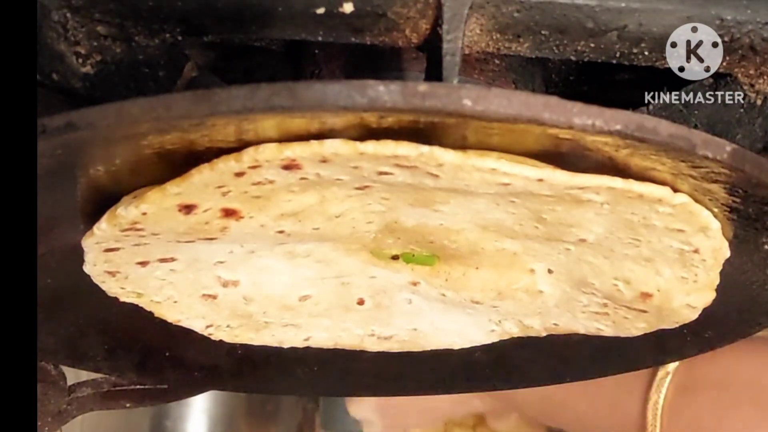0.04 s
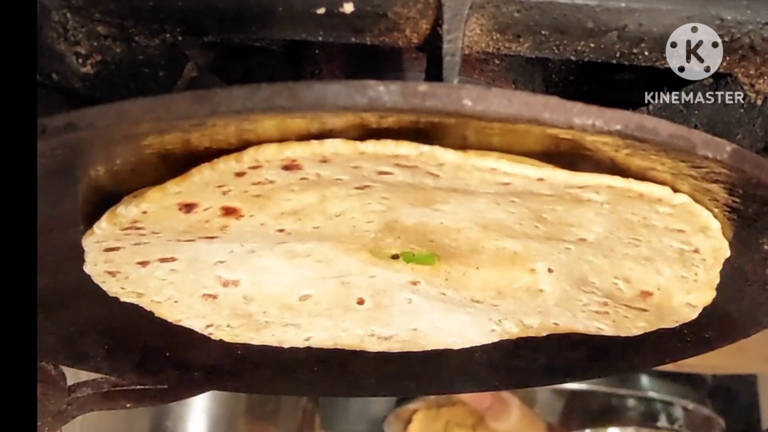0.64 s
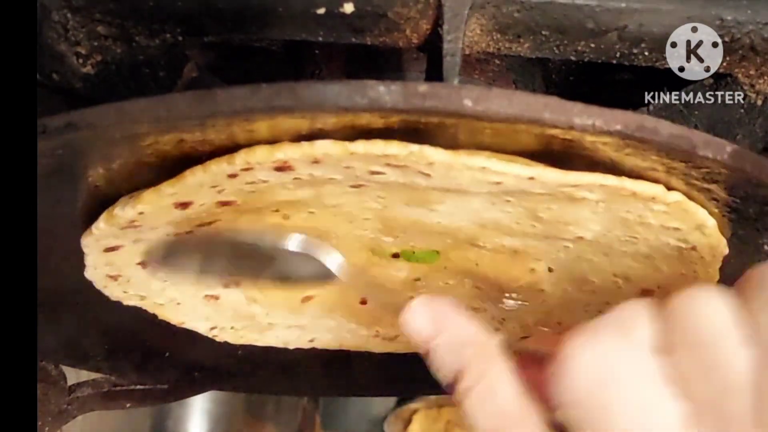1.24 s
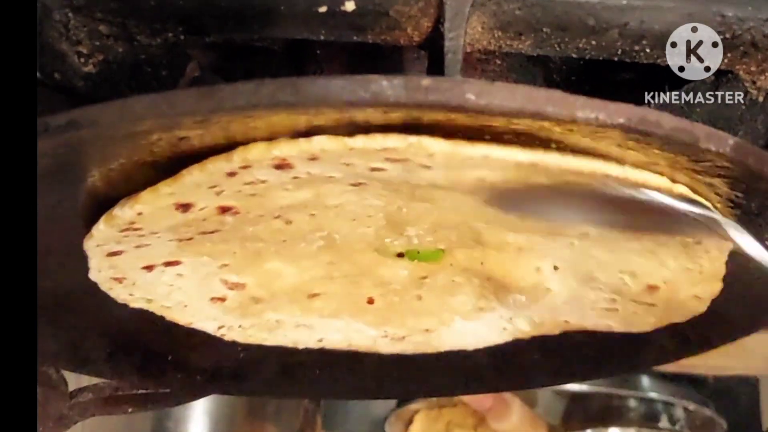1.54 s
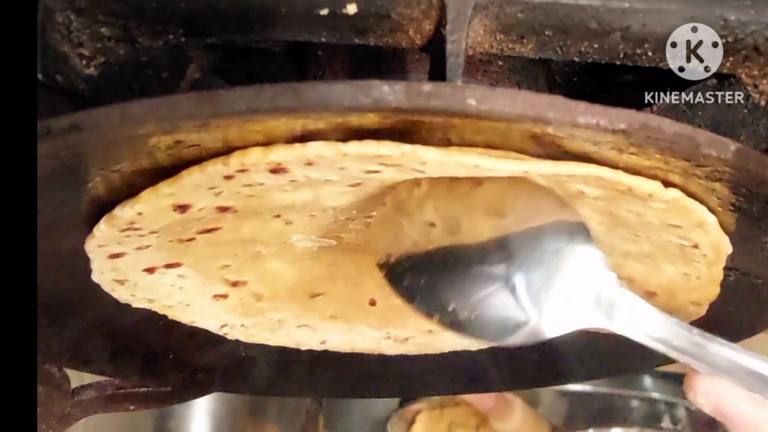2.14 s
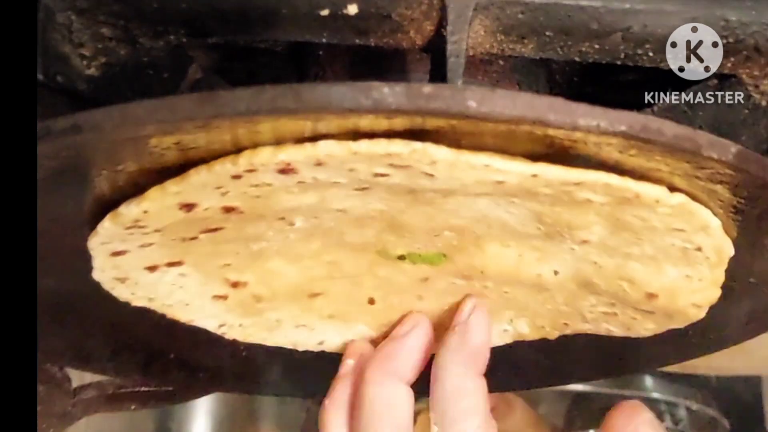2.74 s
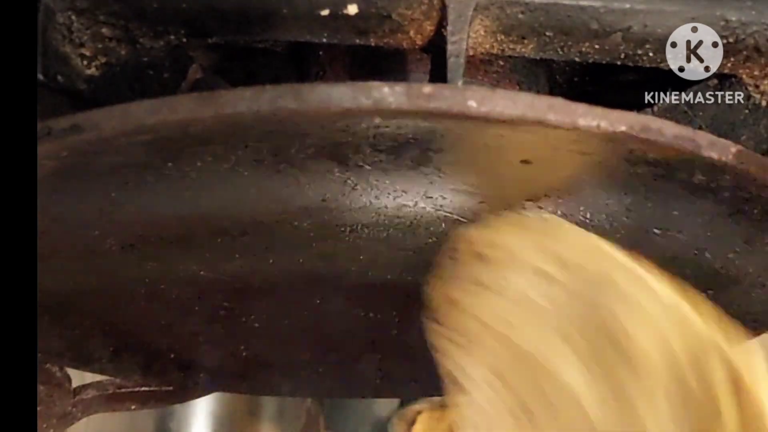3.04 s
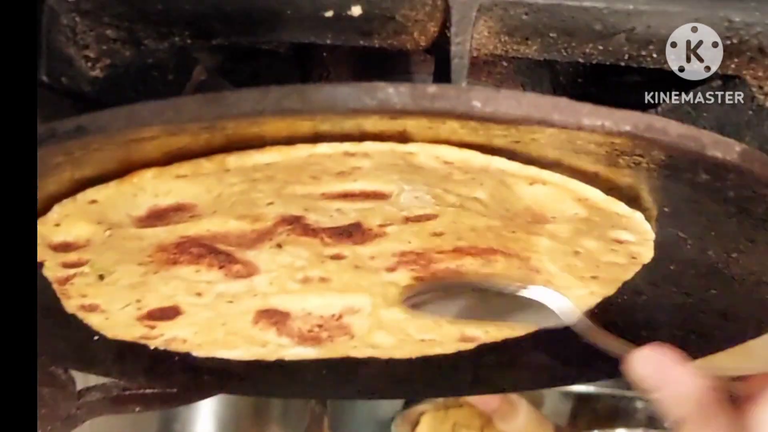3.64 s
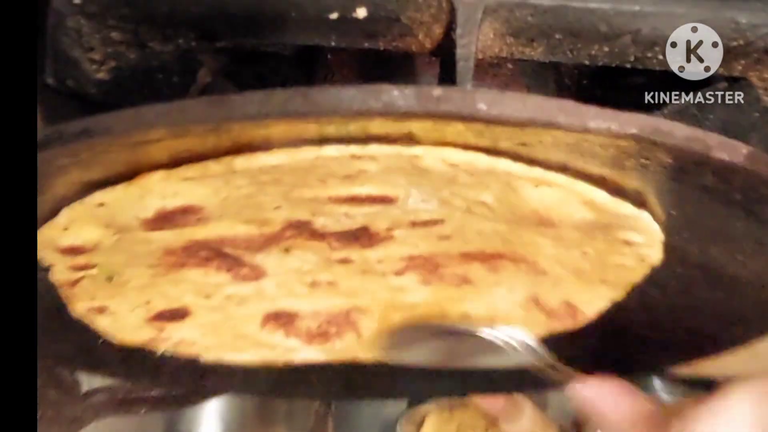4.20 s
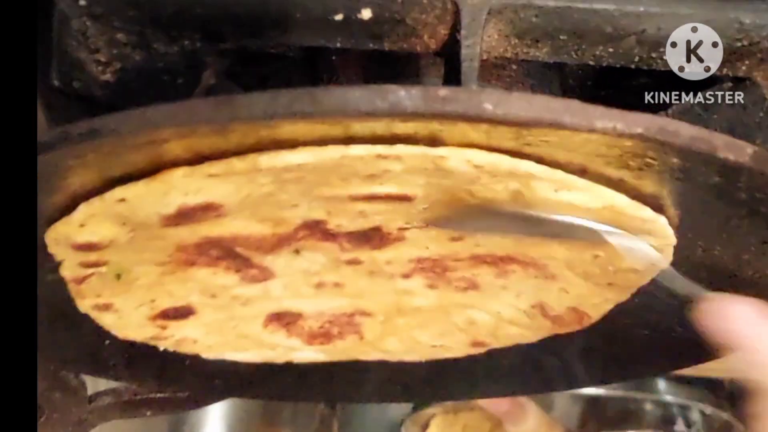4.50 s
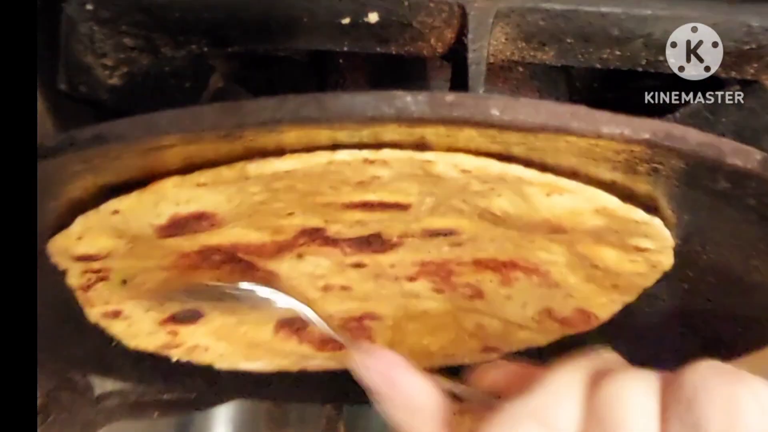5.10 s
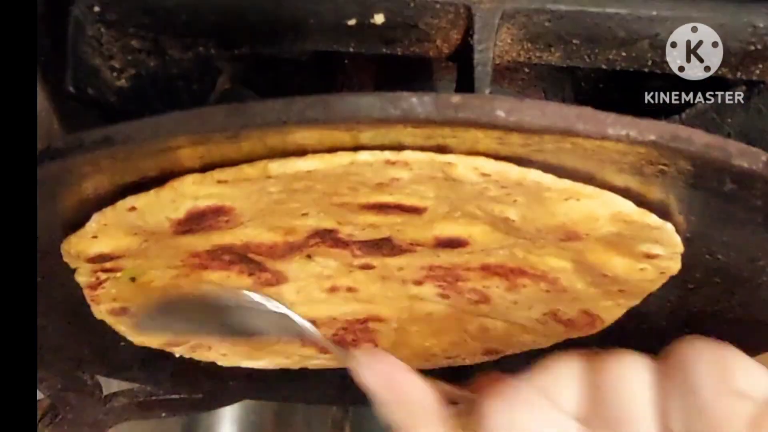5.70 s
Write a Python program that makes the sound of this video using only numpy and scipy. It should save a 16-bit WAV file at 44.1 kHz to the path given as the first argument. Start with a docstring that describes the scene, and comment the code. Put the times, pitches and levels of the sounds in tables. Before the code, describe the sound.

Close up in a small kitchen, flatbread fizzes faintly on an iron griddle over a low burner rumble. A steel spoon rubs oil across it, and each push makes the griddle knock and chatter on its support. Midway the spoon goes down with a sharp clack and the bread flops over softly. Heavier clunks follow as the spoon presses, with one loud clank near the end. The oil spits now and then.

```python
"""Flatbread on an iron griddle

A gas stove in a small kitchen, close up, on a two-port stereo microphone. A steel spoon spreads oil
and presses the frying bread; each push rocks the griddle, which chatters on its support. The spoon
goes down with a clack while the bread is turned. Oil fizzes and spits over a low rumble."""
import sys
import numpy as np
from scipy import signal
from scipy.fft import rfft, irfft
from scipy.io import wavfile
from scipy.ndimage import uniform_filter1d

SR = 44100
rng = np.random.default_rng(int(sys.argv[2]) if len(sys.argv) > 2 else 0)


def int16_out(signal):
    """Quantize to a 16-bit WAV file."""
    q = np.round(np.clip(np.atleast_2d(signal).T, -1, 1) * 32767)
    wavfile.write(sys.argv[1], SR, q.astype(np.int16))


N = 253923
TIME = np.arange(N) / SR
RING_T = np.arange(SR // 2) / SR  # time after a blow [s]
PRESS_S = 3.85  # from here the spoon presses hard: more stove thump, more drag


def griddle():
    """Each knock rings the iron plate, the contact point and the stove beneath."""
    # modes of the plate and of the stove: (frequency [Hz], level [dB], t60 [s])
    plate_modes = [(426, -4, 0.25), (481, -1, 0.25), (520, -3, 0.25), (570, -1, 0.25), (686, -3, 0.25),
                   (748, -2, 0.25), (798, -1, 0.25), (835, -3, 0.25), (892, -5, 0.25), (939, 0, 0.25),
                   (970, -5, 0.25), (1044, -4, 0.25), (1079, -6, 0.25), (1108, -3, 0.25), (1154, -1, 0.25),
                   (1192, -3, 0.25), (1222, -4, 0.25), (1367, -18, 0.25), (1409, -14, 0.25),
                   (1475, -14, 0.25)]
    stove_modes = [(67.4, -9.5, 0.87), (99.5, 1.5, 0.33), (152.5, 5, 0.3), (243, -8.5, 0.38),
                   (279.3, -11.5, 0.72), (279, -30, 0.21), (326.2, -12.5, 0.58)]
    # metal on metal, damped by the dough: (frequency [Hz], level [dB], t60 [s])
    contact_modes = [(2870, -14, .02), (4090, -8, .02), (4320, 0, .03), (4480, -6, .02), (4690, -6, .022),
                     (5320, -13, .02), (5850, -7.5, .018), (6400, -13, .015)]
    body, bright = np.zeros((2, 2, N))
    t = RING_T[:4096]
    lean_left = amp([[1], [-1.5]])
    for s, db, thump_db, ring_db in knocks():
        length = 0.014 + 0.031 * amp(2 * (db + 10))  # the hardest pushes chatter longest
        force = chatter(length / 2)
        plate = ring(plate_modes, spread=0.89) * onset(0.0049)
        stove = ring(stove_modes, spread=0.81) * onset(0.014)  # the heavy frame starts slowly
        stove *= np.exp(-RING_T / 0.068)
        slip = rng.standard_normal(len(t)) * t * np.exp(-t / 0.0058)  # a short metal scrape
        add(body, s, amp(db - 9.5) * peaked(convolve(force, plate)))
        add(body, s, amp(db - 6) * peaked(clunk(length)))
        add(body, s, amp(thump_db + 1.5) * lean_left * peaked(convolve(force, stove)))
        add(bright, s, amp(ring_db - 3) * peaked(convolve(slip, ring(contact_modes, spread=2.63))))
    return body + bright + amp(-16) * kitchen(bright)


def knocks(count=4, rock_s=0.022, scatter=0.0796, still_db=-43):
    """A push knocks the griddle, which rocks on, weaker and duller: yields time and three levels."""
    # the spoon tips the griddle: (time [s], knock [dB], bright ring [dB], loss per rock [dB])
    pushes = [(1.141, -30.5, -48, 14), (1.232, -35.5, -74, 5.5), (1.380, -29, -43.5, 14),
              (1.713, -36.5, -58, 14), (1.798, -36.5, -75, 4), (1.976, -24.5, -37, 21),
              (2.058, -38, -56, 12), (2.144, -35, -60, 15), (2.186, -33, -49, 10),
              (2.283, -28.5, -42.5, 18), (2.329, -33, -48, 20), (2.487, -33, -75, 12),
              (2.558, -24.5, -39, 20), (2.884, -39.5, -70, 8), (2.925, -41.5, -69, 8), (3.009, -39, -75, 6),
              (3.293, -24, -40, 8), (3.573, -34, -51, 14), (3.783, -38, -52, 14), (3.871, -32.5, -70, 12),
              (3.893, -26, -60, 13), (3.930, -18, -44, 13), (3.945, -19, -49, 12),
              (3.964, -16.5, -39.5, 12.5), (4.009, -29.5, -40, 14), (4.18, -27, -45.5, 16),
              (4.218, -24, -70, 24), (4.409, -19.5, -38, 5), (4.534, -31, -62, 14), (4.627, -27.5, -53, 7),
              (4.760, -22, -39.5, 6.5), (4.807, -25.5, -51, 20), (4.83, -26, -66, 10),
              (4.994, -33, -72, 15), (5.265, -11, -26.5, 6.5), (5.534, -33.5, -57, 10),
              (5.578, -34, -72, 12)]
    for s, db, ring_db, loss_db in pushes:
        uneven = rng.standard_normal(count)
        thump_db = -43 + 0.38 * (db + 25) + 5.5 * (s > PRESS_S)
        for k in range(count):
            lost_db = k * loss_db
            if k == 0 or db - lost_db > still_db:  # a weaker rock no longer lifts the griddle
                # the heavy stove loses least, the bright ring most
                yield s, db - lost_db, thump_db - 0.55 * lost_db, ring_db - lost_db - 1.5 * k
            s += rock_s * (1 + scatter * uneven[k])


def chatter(decay_s, rebounds_per_s=1400):
    """Force of a knock: a first blow and quick, dying rebounds."""
    t = RING_T[:4096]
    rebounds = (rng.random(len(t)) < rebounds_per_s / SR) * rng.standard_normal(len(t))
    force = 0.5 * rebounds * np.exp(-t / decay_s)
    force[0] = 1
    return force


def clunk(length, room_t60=0.61):
    """Crowded modes of pan and grate sound during the chatter; the kitchen holds them a little."""
    # the dense part of a knock: (frequency [Hz], density [dB])
    colour = [(60, -33), (200, -5.5), (370, -10), (470, 1), (640, -2), (800, 1), (1000, -4.5), (1200, -0.5),
              (1320, -10.5), (1700, -19.5), (2300, -25.5), (3500, -32.5), (5500, -32.5), (8000, -44.5),
              (15000, -65)]
    contact = np.exp(-(RING_T / length) ** 2)
    held = amp(-14 - 60 * RING_T / room_t60)
    held *= np.sqrt(length / 0.0057)  # a longer contact fills the room more
    return coloured(port_noise(len(RING_T)) * onset(0.00058) * np.hypot(contact, held), colour)


def spoon_down():
    """The spoon touches, then drops: a hard crack, a short hollow ring and the room after it."""
    # the two contacts: (time [s], ring [dB], crack [dB])
    clacks = [(3.252, -38.5, -61), (3.292, -19, -21)]
    # the surface it strikes: (frequency [Hz], level [dB], t60 [s])
    surface_modes = [(765, -4.5, 0.15), (840, 0.5, 0.026), (1110, 7.5, 0.033)]
    # the crack: (frequency [Hz], density [dB])
    crack_colour = [(200, -26), (600, -11), (900, -4), (1500, -6.5), (1950, -3), (2400, 2), (2800, -0.5),
                    (3900, -3), (4600, -14.5), (6200, -16.5), (7500, -24), (12000, -18.5), (15500, -16)]
    knock, crack = np.zeros((2, 2, N))
    for s, ring_db, crack_db in clacks:
        add(knock, s, amp(ring_db) * peaked(ring(surface_modes, spread=0.2) * onset(0.00068)))
        add(crack, s, amp(crack_db) * peaked(burst(crack_colour, t60=0.021)))
    return knock + crack + kitchen(amp(-14) * knock + amp(1) * crack)


def spoon_clinks():
    """The steel spoon clinks lightly."""
    # clinks: (time [s], level [dB], room send [dB])
    clinks = [(.2245, -34, -3), (.228, -35, 0), (5.267, -30, -9), (5.271, -33, -4.5)]
    # struck steel: (frequency [Hz], density [dB])
    colour = [(200, -4), (750, -15), (1100, -2), (1600, -17.5), (2600, -16), (3400, -3.5), (4700, -12),
              (5500, -2.5), (7200, -5), (9000, -4), (11400, -8.5), (13700, -4.5), (15500, -24)]
    return ticks(clinks, colour, t60=0.018)


def frying(flop_s=3.3, turned_s=3.55, soften_s=0.27):
    """Oil bubbles burst, the bread rubs on the iron, and the dragging spoon makes the plate murmur."""
    # how hard the bread is worked: (time [s], effort [dB])
    effort = [(0.0, -65.5), (0.18, -70), (0.35, -69.5), (0.72, -75), (1.02, -70.5), (1.25, -62),
              (1.64, -58.5), (1.72, -60), (2.95, -66.5), (3.08, -72), (3.33, -72), (3.45, -66.5),
              (3.82, -62), (4.12, -64.5), (4.52, -60.5), (5.24, -61), (5.42, -68), (5.76, -67.5)]
    # spoon or finger smears the oily bread: (time [s], swell [dB], half length [s])
    smears = [(0.12, 6.5, 0.093), (0.337, 11.5, 0.027), (1.107, 8.5, 0.067), (1.626, 8.5, 0.019),
              (2.874, 8.5, 0.06), (2.946, 9.5, 0.022), (3.06, 8.5, 0.048), (3.83, 7, 0.024),
              (5.054, 3.5, 0.013)]
    # bubbles, rubbing bread and dragging spoon: (frequency [Hz], density [dB])
    fizz_colour = [(2000, -31), (4500, -6), (7000, -6), (9500, 0.5), (12000, 4), (13500, 1.5), (15000, -15),
                   (16000, -28)]
    rub_colour = [(900, 1.5), (1800, -6), (2500, 1), (3300, 2.5), (5000, 1.5), (6500, -1.5), (10000, -6.5)]
    drag_colour = [(29, -45), (50, -8.5), (123, -2.5), (172, -4), (215, -5.5), (281, -10.5), (314, -5),
                   (411, -18), (466, -4.5), (513, -20), (726, -12), (878, -19), (1150, -10), (1580, -68),
                   (2200, -31), (2860, -61), (4840, -120)]
    work = amp(np.interp(TIME, *np.transpose(effort)) + 61)  # one during steady spreading
    smear = amp(sum(db * np.exp(-((TIME - s) / half) ** 2) for s, db, half in smears))
    # once turned, the dry crust rubs louder until oil softens it
    crust = amp(10.5 * (TIME > turned_s) * np.exp(-abs(TIME - turned_s) / soften_s))
    landed = np.maximum(TIME - flop_s, 0) / 0.04
    flop = amp(-36.5) * landed * np.exp(1 - landed)  # the bread lands with a dull swell
    fizz = amp(-57) * work * smear ** 0.45 * grains(fizz_colour, per_s=6000, spread_db=1)
    rub = amp(-60) * work ** 0.88 * smear * crust * grains(rub_colour, per_s=5000, spread_db=3.5)
    drag = amp(-50 + 2.5 * (TIME > PRESS_S)) * work ** 0.84
    murmur = (drag + flop) * unit(coloured(port_noise(N), drag_colour))
    return fizz + rub + murmur


def oil_spits():
    """Hot oil spits in single sharp snaps."""
    # spits: (time [s], level [dB], room send [dB])
    spits = [(1.731, -32, -9), (2.033, -48, 5), (3.08, -58, -5), (3.292, -34, -24)]
    # one snap: (frequency [Hz], density [dB])
    colour = [(1500, -42), (4000, -47), (6500, -10), (9000, 2.5), (13500, 5), (15500, -6.5)]
    return ticks(spits, colour, t60=0.018)


def steam(waver=0.013):
    """Steam trapped under the turned bread escapes in thin, unsteady whistles."""
    # squeaks: (time [s], length [s], pitch [Hz], level [dB])
    squeaks = [(3.64, 0.12, 9250, -59), (3.773, 0.051, 4880, -57)]
    out = np.zeros((2, N))
    for s, length, hz, db in squeaks:
        size = round(length * SR)
        pitch = hz * (1 + waver * wander(60)[:size])
        phase = 2 * np.pi * (np.cumsum(pitch) / SR + rng.random((2, 1)) / 2)
        add(out, s, amp(db) * signal.windows.tukey(size, 0.5) * np.sin(phase))
    return out


def room_tone(fade_s=0.034):
    """Burner and room rumble; a low, slightly wavering hum comes and goes."""
    # the rumble: (frequency [Hz], density [dB])
    rumble_colour = [(12, -55), (20, -18), (108, 0), (129, -7), (327, -8.5), (349, -18), (382, -9.5),
                     (621, -40), (1060, -8.5), (1580, -30.5), (2460, -30), (2630, -34), (4000, -42),
                     (5200, -71), (8800, -120)]
    # spells of hum: (start [s], end [s], pitch [Hz], level [dB])
    spells = [(-.1, 0.285, 173.3, -53), (1.676, 3.12, 168.7, -51)]
    waver = 1 + 0.0032 * wander(6000)
    hum = 0
    for start, end, hz, db in spells:
        gate = (1 + np.tanh((TIME - start) / fade_s)) * (1 - np.tanh((TIME - end) / fade_s)) / 4
        phase = 2 * np.pi * np.cumsum(hz * waver) / SR
        hum += amp(db) * gate * np.sqrt(2) * np.sin(phase)
    return amp(-58.5) * unit(coloured(port_noise(N), rumble_colour)) + hum


def kitchen(x):
    """Reverberation of the small hard room, each band dying at its own speed."""
    # room decay: (frequency [Hz], t60 [s])
    decay = [(100, 1), (300, 0.37), (800, 0.49), (2000, 0.3), (5000, 0.41), (9000, 0.38), (15000, 0.13)]
    hz, t, bands = signal.stft(port_noise(32768), SR, nperseg=256)
    tail = signal.istft(bands * amp(-60 * t / read(decay, hz)[:, None]), SR, nperseg=256)[1]
    age = np.arange(tail.shape[1]) / SR
    tail *= 1 - np.exp(-(age / 0.0021) ** 2)  # the first walls answer after a few ms
    return convolve(x, tail / np.linalg.norm(tail[0]))[:, :N]


def ring(modes, spread):
    """Decaying modes, level giving their energy; each reaches the two ports with its own phase."""
    out = 0
    for hz, db, t60 in modes:
        phase = np.pi * rng.integers(0, 2) + spread * rng.standard_normal((2, 1))
        envelope = amp(db - 60 * RING_T / t60) / np.sqrt(t60)
        out += envelope * np.sin(2 * np.pi * hz * RING_T + phase)
    return out


def burst(colour, t60):
    """Many close modes that die together: a coloured, decaying noise."""
    return coloured(port_noise(len(RING_T)) * amp(-60 * RING_T / t60), colour)


def ticks(events, colour, t60):
    """Tiny bright snaps with a hissing room tail."""
    direct, send = np.zeros((2, 2, N))
    for s, db, room_db in events:
        snap = amp(db) * peaked(burst(colour, t60) * onset(0.0001))
        add(direct, s, snap)
        add(send, s, amp(room_db) * snap)
    return direct + kitchen(send)


def grains(colour, per_s, spread_db):
    """Dense tiny bursts of unequal size, blurred by the room."""
    sizes = amp(spread_db * np.minimum(rng.exponential(1, N), 5))
    fires = rng.random(N) < per_s / SR
    direct = coloured(sizes * fires * port_noise(N), colour)
    return unit(direct + amp(1) * kitchen(direct))


def port_noise(size):
    """White noise at the two microphone ports: alike in the bass, less so in the treble."""
    # likeness of left and right: (frequency [Hz], correlation)
    likeness = [(50, 0.69), (150, 0.92), (280, 0.44), (700, 0.85), (1200, -0.21), (2000, -0.43),
                (5000, 0.43), (16000, -0.24)]
    left, other = rfft(rng.standard_normal((2, size)))
    same = read(likeness, np.fft.rfftfreq(size, 1 / SR))
    right = same * left + np.sqrt(1 - same ** 2) * other
    return irfft(np.array([left, right]), size)


def coloured(x, colour):
    """Minimum-phase filter with the given spectrum."""
    log_gain = np.log(amp(read(colour, abs(np.fft.fftfreq(4096, 1 / SR)))))
    response = np.exp(np.conj(signal.hilbert(log_gain)))
    taps = np.fft.ifft(response).real[:2048]
    return convolve(x, taps)[:, :x.shape[1]]


def onset(rise_s):
    """Smooth rise after a blow."""
    return 1 - np.exp(-RING_T / rise_s)


def wander(samples):
    """Random drift, smoothed over this many samples."""
    return unit(uniform_filter1d(rng.standard_normal(N), size=samples))


def amp(db):
    """Decibels to gain."""
    return 10 ** (np.asarray(db) / 20)


def unit(x):
    """Scales to an rms of one."""
    return x / np.sqrt(np.mean(x ** 2) + 1e-20)


def peaked(x):
    """Scales the loudest 4 ms to an rms of one."""
    return x / np.sqrt(uniform_filter1d((x ** 2).mean(0), size=176).max() + 1e-20)


def read(points, hz):
    """Reads a table on a log-frequency axis."""
    f, value = np.transpose(points)
    return np.interp(np.log(hz + 1), np.log(f), value)


def add(mix, s, sound):
    """Mixes a stereo sound in at time s."""
    part = mix[:, round(s * SR):][:, :sound.shape[1]]
    part += sound[:, :part.shape[1]]


def convolve(a, b):
    """Convolution along time, channel by channel."""
    return signal.fftconvolve(np.atleast_2d(a), np.atleast_2d(b), axes=1)


def scene():
    """Everything at the stove, from close by."""
    spoon = spoon_down() + spoon_clinks()
    cooking = frying() + steam() + oil_spits()
    return griddle() + spoon + cooking + room_tone()


def record(dry, edge_hz=15500):
    """Each microphone port has its own colour; the top of the treble is cut off."""
    # port balance: (frequency [Hz], left minus right [dB])
    balance = [(60, -2.5), (110, 0), (190, 3), (280, 0.5), (700, -8.5), (1200, -16), (1600, -1),
               (2400, 2.5), (3300, -0.5), (4400, -3), (8000, 0), (13000, -8.5)]
    ratio = amp(read(balance, np.fft.rfftfreq(N, 1 / SR)))
    ports = np.array([ratio, np.ones_like(ratio)]) * np.sqrt(2 / (1 + ratio ** 2))
    heard = irfft(rfft(dry) * ports, N)
    lowpass = signal.firwin(511, edge_hz, window=("kaiser", 9), fs=SR)
    return signal.oaconvolve(heard, lowpass[None], "same", axes=1)


dry = scene()
out = record(dry)
int16_out(out)
```